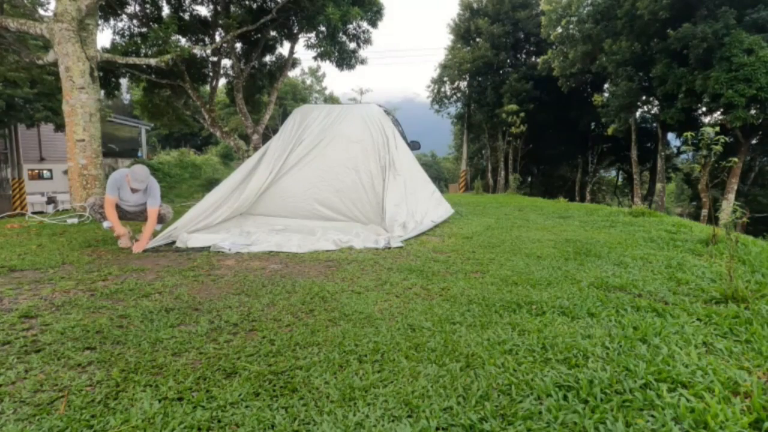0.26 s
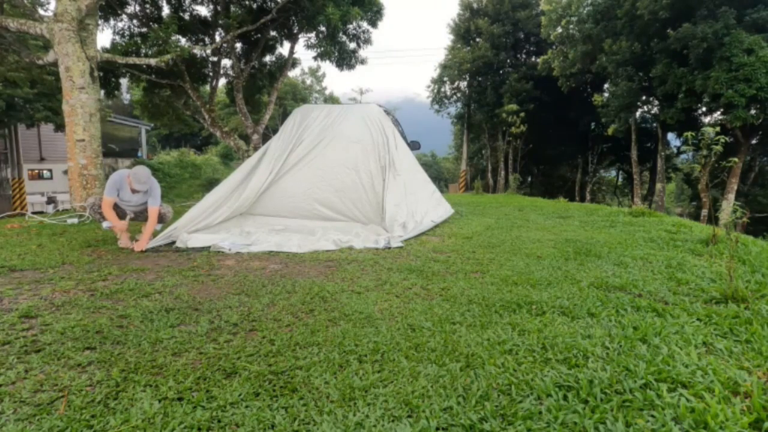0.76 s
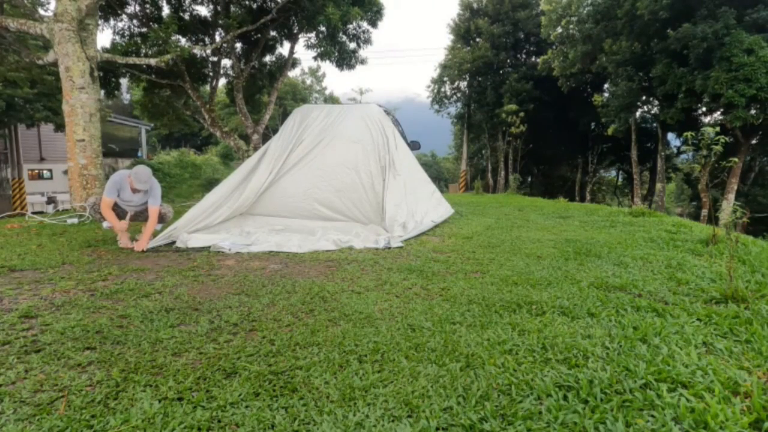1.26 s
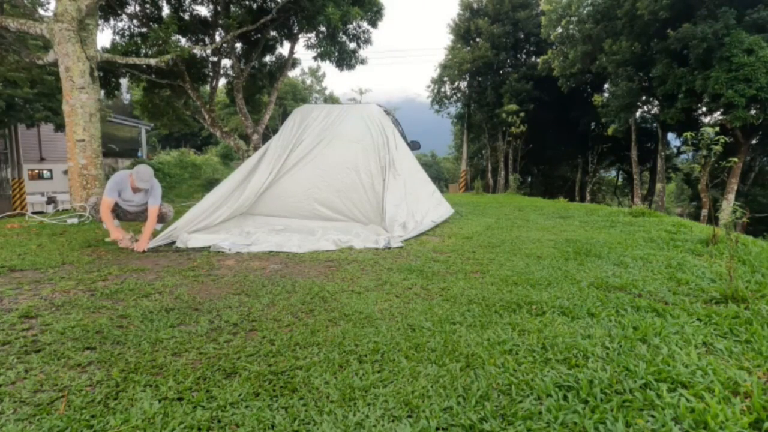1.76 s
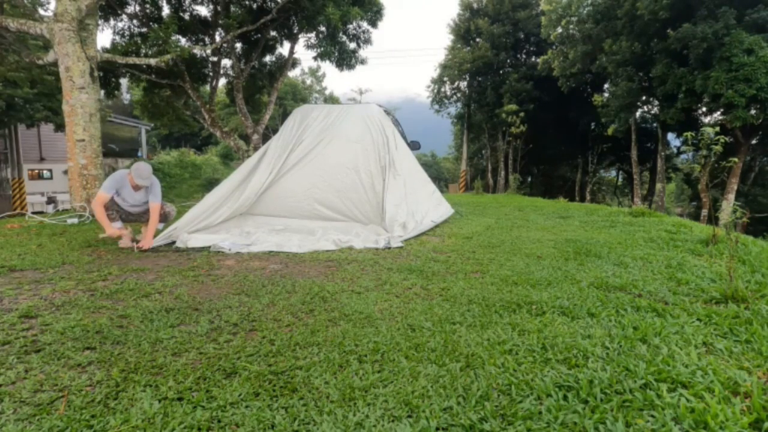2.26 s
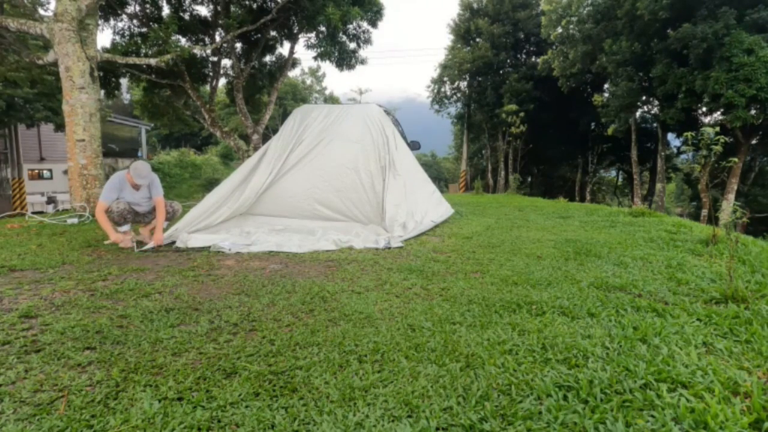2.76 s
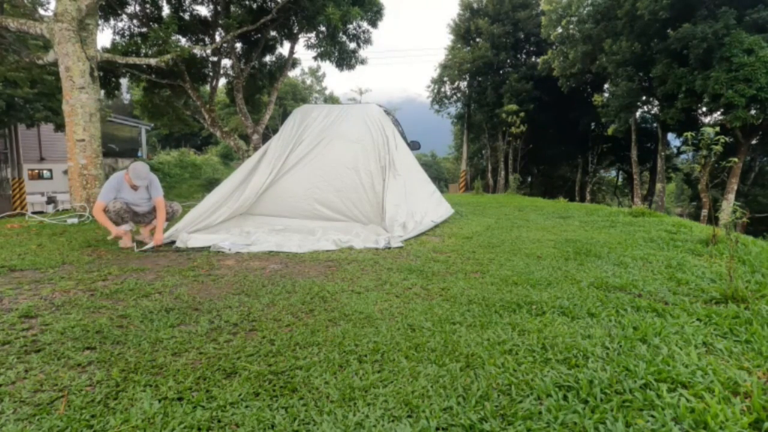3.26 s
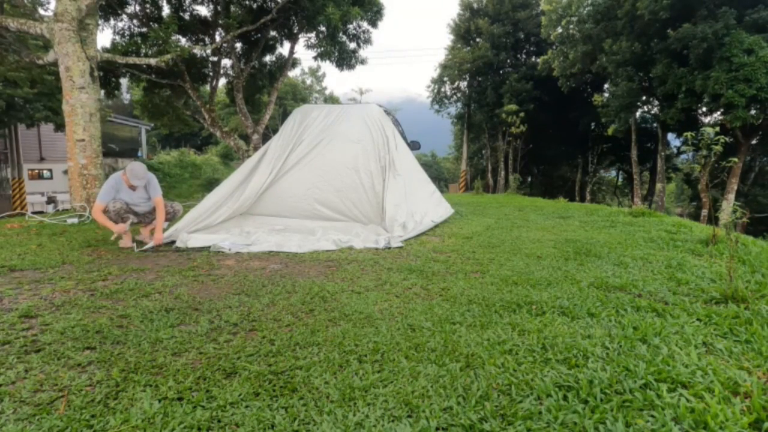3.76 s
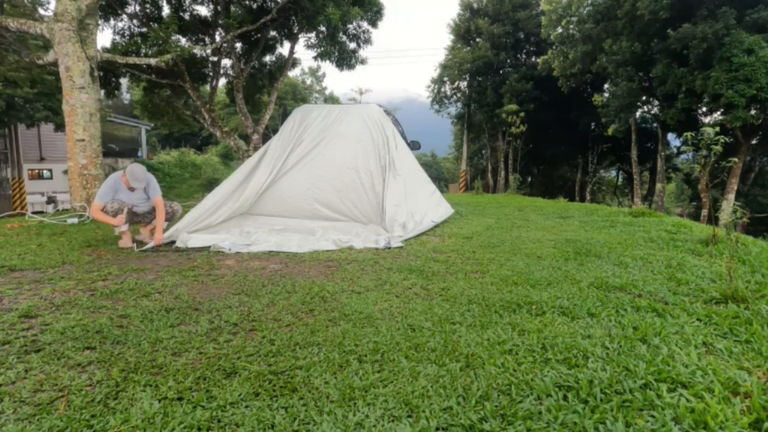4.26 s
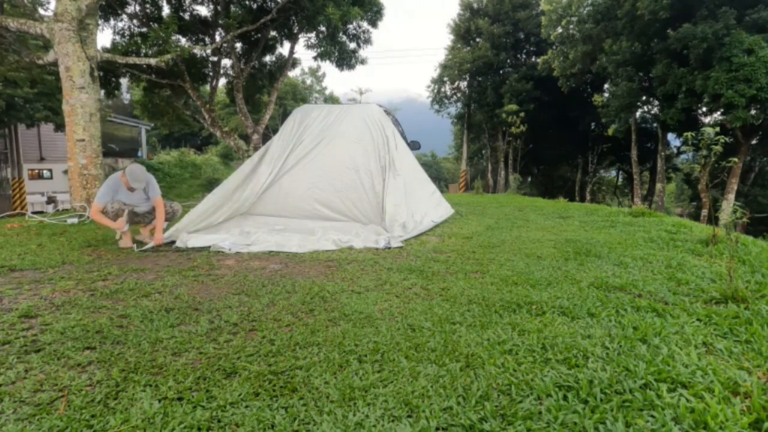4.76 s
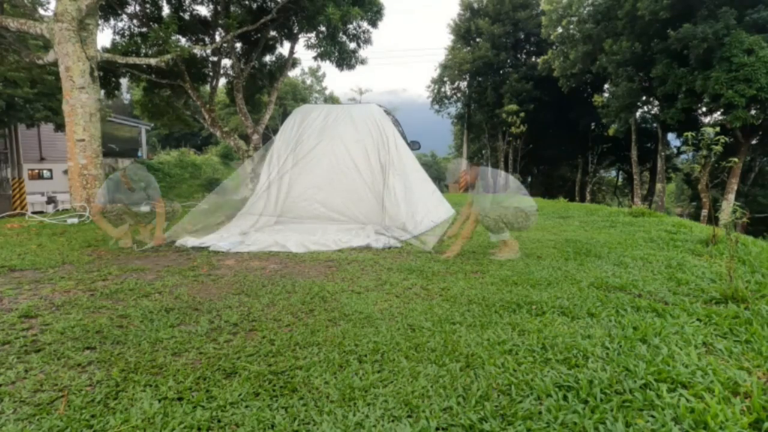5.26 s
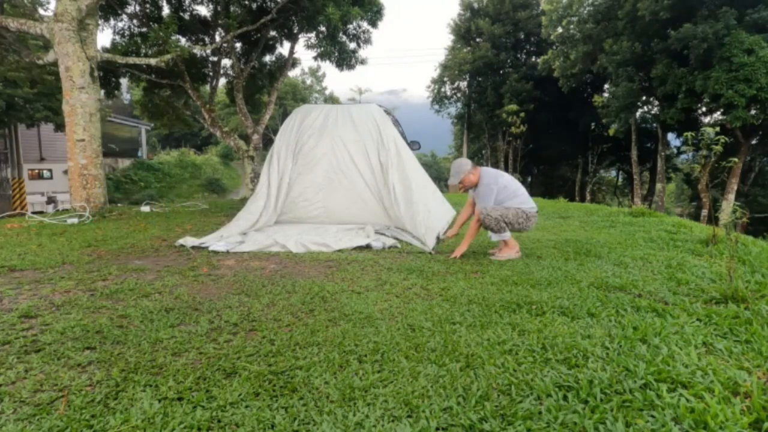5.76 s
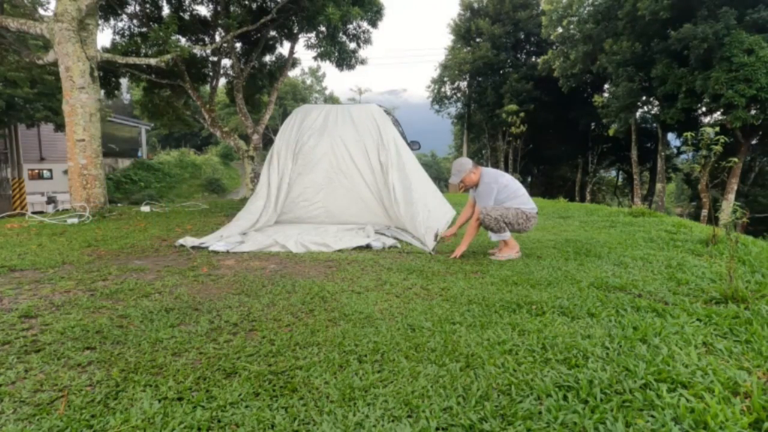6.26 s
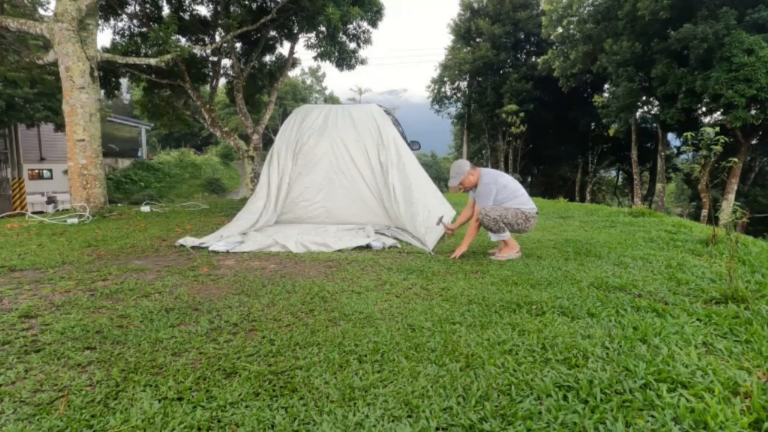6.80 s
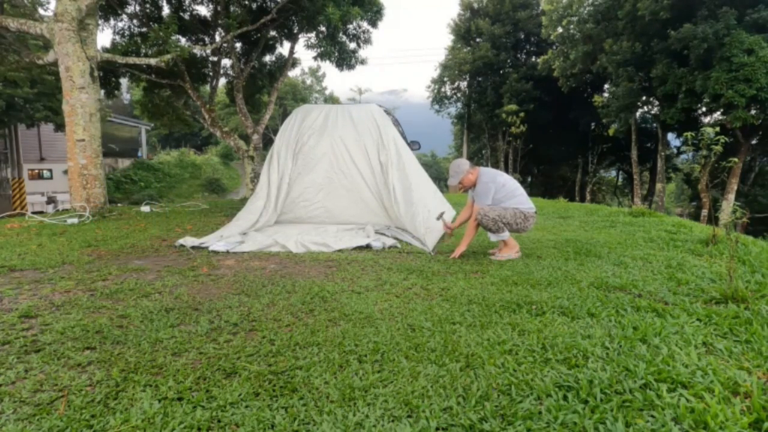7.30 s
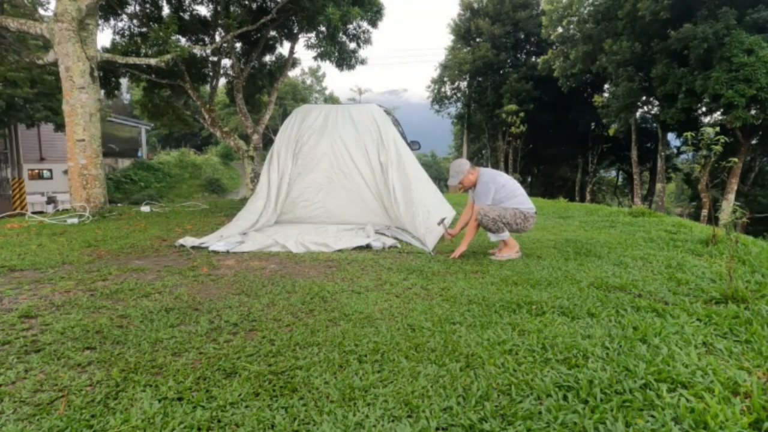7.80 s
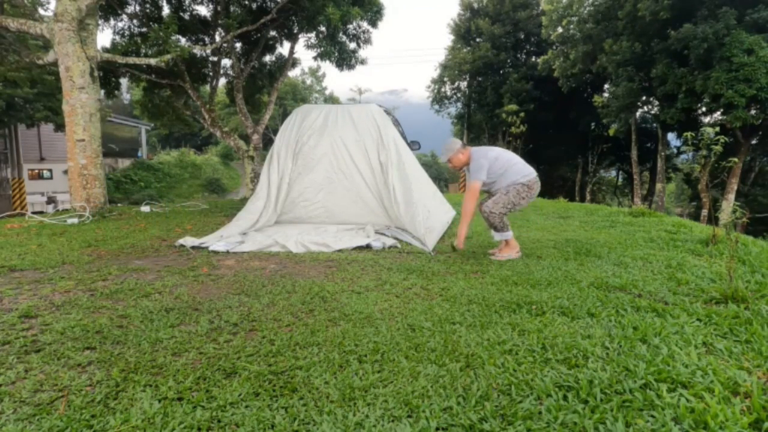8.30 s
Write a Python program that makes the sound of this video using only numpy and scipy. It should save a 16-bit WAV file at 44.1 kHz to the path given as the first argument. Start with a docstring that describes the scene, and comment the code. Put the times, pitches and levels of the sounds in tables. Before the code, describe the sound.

A steel hammer drives tent stakes into a lawn, a little over two blows a second. Each blow is a sharp metallic crack with a brief high ring, a soil thud and a short echo off canvas and trees. From 0.3 to 5 seconds the blows come slightly from the left, with solid thuds and one weaker hit near 2.8 seconds. Around 5.3 seconds the hammering shifts slightly right to a second stake, briefly overlapping the first, and continues with lighter thuds until 8 seconds. Light taps fall between blows, with a last one near 8.3 seconds.

The background is much quieter. One cricket chirps in high runs while another trills faintly farther off. A distant bird gives short whistles until about 4.5 seconds. Leaves hiss, light wind buffets the microphone and a low rumble lies far away. A faint, hollow swell of air passes near 6.5 seconds.

```python
"""Hammering tent stakes into a lawn

A steel hammer drives in two stakes, first on the left, then on the right, with light taps in between.
Each blow cracks, rings in the hammer head, thuds in the soil and echoes off trees and canvas.
Behind it two crickets chirp, a far bird whistles, leaves hiss and light wind buffets the microphone.
There is a low rumble in the distance and, once, a hollow, breathy swell."""
import sys
import numpy as np
from scipy import signal
from scipy.fft import rfft, irfft, next_fast_len
from scipy.io import wavfile

SR = 44100
rng = np.random.default_rng(int(sys.argv[2]) if len(sys.argv) > 2 else 0)


def wav_out(sig):
    """Save sig, one row per channel (or a flat mono array), as 16-bit PCM at SR to the path in sys.argv[1]."""
    wavfile.write(sys.argv[1], SR, np.round(np.clip(np.atleast_2d(sig).T, -1, 1) * 32767).astype(np.int16))


N = 376613

# How loud the background is. Each row: time in seconds, then wind, far rumble and leaves in dB.
AIR_LEVELS = [(0.0, -48, -54.5, -63), (0.55, -46, -57.5, -60.5), (3.12, -48.5, -56, -62),
              (3.52, -53.5, -58.5, -63), (3.88, -46.5, -57, -64), (5.11, -52.5, -60.5, -62.5),
              (5.76, -54, -56, -61.5), (6.59, -58.5, -56, -61), (8.54, -53.5, -54.5, -62.5)]
# The tone of those three noises. Each row: frequency in Hz, level in dB.
WIND_TONE = [(12, -46), (20, -2.5), (70, -2.5), (91, -28.5), (150, -120)]
RUMBLE_TONE = [(35, -35.5), (60, -5), (183, -7), (242, -18), (426, -39), (466, -67), (500, -36), (650, -48),
               (1100, -120)]
LEAF_TONE = [(180, -40), (300, 0), (462, -7), (870, -13.5), (1010, -8), (1510, -4), (1810, -0.5),
             (2400, -9.5), (3640, -5.5), (4830, -6.5), (5430, -6.5), (5900, -14), (8790, -18), (12100, -23),
             (16000, -43)]
# How alike left and right sound. Each row: frequency in Hz, likeness from 0 to 1.
STEREO_LIKENESS = [(30, 0.76), (100, 1), (290, 0.49), (640, 0.11), (1410, 0.69), (3100, 0.25), (6820, 0.56),
                   (15000, 0.35)]
# The breathy swell. Each row: time in seconds, level in dB.
SWELL_LEVELS = [(6.3, -79), (6.48, -56), (6.66, -75.5)]
# The bird's song. Each row: start and length in seconds, final pitch in Hz, level in dB,
# kind of note (0 low, 1 high).
BIRD_NOTES = [(0, 0.04, 1240, -58.5, 0), (0.088, 0.054, 1220, -65, 0), (0.099, 0.21, 2040, -69.5, 1),
              (0.614, 0.1, 1254, -58, 0), (1.201, .115, 1180, -70, 0), (1.175, 0.11, 1950, -64, 1),
              (1.878, .13, 1225, -67, 0), (1.866, 0.228, 1944, -64, 1), (2.63, 0.3, 1987, -70.5, 1),
              (3.458, 0.27, 1930, -69.5, 1), (4.321, 0.23, 1970, -69, 1)]
# The far cricket. Each row: time in seconds, level in dB.
TRILL_LEVELS = [(0, -73), (1, -68), (2, -73), (3.5, -93.5), (4.8, -79.5), (5.2, -76), (6, -69.5),
                (6.8, -76), (7.5, -67.5), (7.9, -81), (8.54, -92)]
# The near cricket's runs of chirps. Each row: first and last chirp in seconds, level in dB.
CHIRP_RUNS = [(0.565, 0.764, -58), (2.093, 2.661, -57.5), (2.835, 3.52, -57), (3.708, 4.622, -57),
              (4.782, 4.963, -57), (5.173, 5.567, -58), (5.745, 6.808, -55), (7.001, 7.894, -56.5),
              (8.083, 8.45, -56.5)]
# The echo from far trees. Each row: frequency in Hz, seconds to fade by 60 dB (called t60 below).
ECHO_FADES = [(300, 0.6), (1000, 0.65), (3000, 0.55), (6000, 0.55), (10000, 0.38), (15000, 0.32)]
# What trees and canvas send back. Each row: frequency in Hz, gain in dB.
ECHO_TONE = [(290, -40), (500, -10.5), (562, -15), (1400, -10.5), (4210, 2), (7210, -1.5), (8960, -7.5),
             (10400, -0.5), (11000, -14), (14200, -22.5), (16000, -49)]
# Light taps. Each row: start in seconds, tick level in dB, pitch in Hz, thump level in dB.
TAPS = [(0.35, -51, 3700, -61), (0.515, -56, 4180, -82), (1.153, -46, 1930, -66), (1.203, -57, 1570, -52),
        (1.523, -53, 3670, -77), (1.943, -54, 2100, -76), (2.414, -54.5, 4040, -44.5),
        (3.011, -52, 1760, -66), (3.106, -65, 1340, -81), (3.363, -41.5, 2300, -57),
        (3.79, -46.5, 2670, -66), (4.798, -50, 3700, -50), (5.263, -55.5, 5580, -54.5),
        (5.333, -43.5, 1100, -65), (5.388, -60, 990, -73), (5.686, -55.5, 1120, -63),
        (6.058, -50, 1880, -67), (6.106, -64.5, 1380, -73), (6.463, -43, 1090, -77),
        (6.786, -51, 3970, -66), (6.811, -49, 2330, -83), (6.837, -58, 2160, -60),
        (7.628, -48.5, 1500, -62), (7.698, -51.5, 2760, -55), (8.28, -39.5, 5160, -39.5)]
# The tone of steel hitting steel. Each row: frequency in Hz, level in dB.
CRACK_TONE = [(180, -54.5), (300, 9), (455, 1), (749, -22.5), (2210, -16.5), (6200, -1), (8940, -16.5),
              (10200, -5.5), (12300, -18.5), (14200, -30.5), (16000, -38.5)]
# The left and right stake. Each row: low and high pitch in Hz, chatter time in seconds,
# gains in dB for the dull part, bright part and echo, then dB louder on the left.
STAKES = [(2330, 4270, 0.0064, -15.5, -15.5, -3.5, 3.5), (2830, 3950, 0.008, -10, -11, -1, -3.5)]
# The pitches of the hammer head in Hz.
HEAD_HZ = [8190, 8245, 3625, 10180, 10225, 10160, 13810, 14300]
# How each of those rings. Each row: gain in dB, t60 in seconds, blow that rings it (0 glancing, 1 square).
HEAD_RINGS = [(-15.5, 0.11, 0), (-12.5, 0.033, 0), (-15.5, 0.07, 1), (-3, 0.038, 1), (-10.5, 0.16, 1),
              (-19.5, 0.11, 1), (-23.5, .07, 1), (-21, .08, 1)]
# The thud as each stake sinks, left list then right. Each row: time in seconds, pitch in Hz.
THUD_PITCH = [
    [(.26, 96), (1.2, 108), (5.4, 114)],
    [(5.3, 171.6), (7.15, 190), (7.6, 132), (8.0, 100)],
]
# The hammer blows. Each row: start in seconds, levels in dB of the crack, glancing ring, square ring,
# thud and soil crunch, then the stake (0 left, 1 right).
BLOWS = [(0.258, -26, -16, -21, -37, -43, 0), (0.657, -24, -17.5, -60, -27.5, -44, 0),
         (1.044, -23.5, -28, -21, -24, -46.5, 0), (1.444, -23, -19.5, -27, -20, -47, 0),
         (1.829, -24, -18.5, -30, -20.5, -37.5, 0), (2.206, -23, -25, -27, -21, -45.5, 0),
         (2.79, -33, -41, -65, -29.5, -35, 0), (3.223, -22.5, -52, -42, -21, -38, 0),
         (3.659, -23.5, -22, -37, -20, -40.5, 0), (4.103, -22.5, -37, -37.5, -20, -39.5, 0),
         (4.54, -22.5, -18, -28.5, -20, -41.5, 0), (4.974, -28, -16, -23, -24, -40, 0),
         (5.318, -29, -57, -25, -41.5, -54, 1), (5.436, -37, -30, -37, -33, -54, 0),
         (5.785, -26, -54, -22, -34, -40.5, 1), (6.238, -24, -56, -19.5, -36.5, -41.5, 1),
         (6.684, -25.5, -38, -20, -39, -39, 1), (7.132, -24, -33, -21.5, -34.5, -41.5, 1),
         (7.571, -23.5, -49.5, -20.5, -29.5, -39, 1), (7.991, -25, -41, -26, -31.5, -39, 1)]

NOTE_FALL_HZ, OCTAVE_DB = 41.7, (-13, -1.5)   # octave level for low and high bird notes
TRILL_START_S, TRILL_GAP_S = .0275, .0575
CHIRP_GAP_S, PAIR_GAP_S, STROKE_GAP_S = .183, .030, .013
TAP_T60_S, TAP_CLINK, TAP_PAN_DB, TAP_ECHO_DB = .028, .87, 2, -5
LOW_T60_S, HIGH_T60_S = .004, .006   # the soil quickly damps the stake's two pitches
PITCH_SPREAD = .042   # share by which those pitches vary from blow to blow
RING_SHARE = (.35, 1.0)   # share of the head's square ring time on the left and right stake
THUD_T60_S, THUD_DROP, THUD_DROP_S = .087, .6, .005   # the thud starts higher by this share and sinks
REBOUND_S, REBOUND_DB, REBOUND_PITCH, REBOUND_WIDTH_S = .045, -19, .8, .013
CUTOFF_HZ = 17000


def amp(db):
    """Turn decibels into a gain."""
    return 10 ** (np.asarray(db) / 20)


def rms_one(x):
    """Scale a sound to an average (rms) level of 1."""
    return x / np.sqrt(np.mean(x ** 2) + 1e-20)


def in_time(rows):
    """Turn each level column of a table into a curve with one value per sample."""
    s, *columns = np.transpose(rows)
    return [np.interp(np.arange(N) / SR, s, c) for c in columns]


def at_hz(points, hz):
    """Look up a table by frequency, with octaves evenly spaced."""
    freqs, values = np.transpose(points)
    return np.interp(np.log(hz), np.log(freqs), values)


def colour(x, tone):
    """Turn frequencies up or down as a tone table says."""
    size = x.shape[-1]
    hz = np.maximum(np.arange(size // 2 + 1) * SR / size, 1)
    return irfft(rfft(x) * amp(at_hz(tone, hz)), size)


def bandpass(x, low_hz, high_hz):
    """Keep what lies between two frequencies."""
    return signal.sosfilt(signal.butter(2, [low_hz, high_hz], "band", fs=SR, output="sos"), x)


def band(x, low_hz, high_hz):
    """Keep one band and scale it so its first 5 ms have level 1."""
    y = bandpass(x, low_hz, high_hz)
    return y / np.std(y[:220])


def drift(rate_hz):
    """A slow random wobble, about 1 in size."""
    r = np.exp(-80 * np.pi * rate_hz / SR)
    slow = signal.lfilter([1], [1, -2 * r, r * r], rng.standard_normal(N // 40 + 2002))[2000:]
    return np.interp(np.arange(N) / 40, np.arange(len(slow)), rms_one(slow))


def ring(x, hz, t60):
    """Let a sound set one fading pitch ringing."""
    r, w = amp(-60 / (t60 * SR)), 2 * np.pi * hz / SR
    return signal.lfilter([0, np.sin(w)], [1, -2 * r * np.cos(w), r * r], x + 1e-18)


def add(out, sound, s, pan_db=0):
    """Mix a sound in at s seconds, pan_db louder on the left."""
    i = int(np.clip(round(s * SR), 0, N))
    part = np.atleast_2d(sound)[:, :N - i]
    out[:, i:i + part.shape[1]] += part * amp([[pan_db / 2], [-pan_db / 2]])


def air_noise(tone, flicker_db, rate_hz):
    """Wind, rumble or leaves: stereo noise in half-octave bands that each flicker in level."""
    out, together, edges = 0, drift(1.5), 18 * 2 ** np.arange(0, 10, .5)
    noise = colour(rng.standard_normal((2, 2, next_fast_len(N))), tone)[..., :N]
    for k, (low, high) in enumerate(zip(edges, np.append(edges[1:-1], 19000))):
        if tone[0][0] < high and low < tone[-1][0]:
            mid, side = bandpass(noise[k % 2], low, high)   # neighbours get unrelated noise
            alike = at_hz(STEREO_LIKENESS, np.sqrt(low * high))
            gain = amp(flicker_db * (0.13 * together + drift(rate_hz)))
            out = out + gain * (np.sqrt(1 + alike) * mid + np.sqrt(1 - alike) * side * [[1], [-1]])
    return rms_one(out)


def swell():
    """A narrow band of noise rises and falls, like a hollow breath far off."""
    breath = rms_one(bandpass(rng.standard_normal(N), 770, 960))
    t = np.arange(N) / SR
    return breath * amp(in_time(SWELL_LEVELS)[0]) * (t > SWELL_LEVELS[0][0]) * (t < SWELL_LEVELS[-1][0])


def bird():
    """Whistles with an octave on top slide down a little and waver in level over the distance."""
    out = np.zeros((2, N))
    for start, length, hz, level_db, kind in BIRD_NOTES:
        along = np.linspace(0, 1, round(length * SR))
        phase = 2 * np.pi * np.cumsum(hz + NOTE_FALL_HZ * (1 - along) ** 3) / SR
        whistle = np.sin(phase) + amp(OCTAVE_DB[round(kind)]) * np.sin(2 * phase)
        add(out, amp(level_db) * np.sin(np.pi * along) ** 0.13 * whistle, start)
    return out * amp(2.5 * drift(30.5))


def far_cricket():
    """Pairs of wing strokes make a lower, unbroken trill that fades in and out with the air."""
    out, t = np.zeros((2, N)), np.arange(480) / SR
    stroke = np.sin(2 * np.pi * np.cumsum(4380 - 35000 * t) / SR) * np.hanning(len(t))
    for s in np.arange(TRILL_START_S, N / SR, TRILL_GAP_S):
        add(out, stroke, s - .005)
        add(out, .9 * stroke, s + .01)
    return rms_one(out) * amp(in_time(TRILL_LEVELS)[0] + 2.5 * drift(7))


def near_cricket():
    """Each chirp is three pairs of wing strokes, and each stroke is a short falling tone."""
    out, t = np.zeros((2, N)), np.arange(380) / SR
    fade = np.hanning(len(t)) ** 0.74
    for first_s, last_s, level_db in CHIRP_RUNS:
        for s in np.linspace(first_s, last_s, round((last_s - first_s) / CHIRP_GAP_S) + 1):
            for k in range(6):
                detune, louder, slip = rng.standard_normal(3)
                stroke = np.sin(2 * np.pi * np.cumsum(5800 + 50 * detune - 90000 * t) / SR) * fade
                start = s - .004 + PAIR_GAP_S * (k // 2) + STROKE_GAP_S * (k % 2) + 0.00074 * slip
                add(out, amp(level_db + 0.18 * k + 1.4 * louder) * stroke, start, pan_db=-1.5)
    return out


def echo(sound):
    """Canvas and near trunks slap the sound back, and far trees add a weaker tail."""
    t, edges, pattern = np.arange(SR // 2) / SR, np.geomspace(150, 19000, 7), 0
    mid, side = rng.standard_normal((2, len(t)))
    noise = mid + 0.33 * side * np.array([[1], [-1]])
    for low, high in zip(edges, edges[1:]):
        slap = amp(-9 * (t / 0.056) ** 2.2)
        tail = amp(-2 - 60 * t / at_hz(ECHO_FADES, np.sqrt(low * high)))
        pattern = pattern + (slap + tail) * bandpass(noise, low, high)
    pattern *= (1 - np.exp(-(t / 0.0048) ** 2)) * np.clip((t[-1] - t) / 0.076, 0, 1)   # soften both ends
    pattern /= np.sqrt(np.sum(pattern ** 2) / 2)
    return signal.fftconvolve(np.atleast_2d(sound), colour(pattern, ECHO_TONE), axes=1)


def taps():
    """Hammer, stake and cord touch lightly, each time with a short tick and a soft thump."""
    out, t = np.zeros((2, N)), np.arange(2205) / SR
    for s, tick_db, hz, thump_db in TAPS:
        burst = rng.standard_normal(len(t)) * (amp(-60 * t / 0.01) + amp(15 - 60 * t / TAP_T60_S))
        tick = band(burst, hz / 1.76, hz * 1.68) + 0.1 * band(burst, 1800, 6600)
        tick += TAP_CLINK * band(ring(burst, hz, t60=.006), 600, 12000)
        thump = band(rng.standard_normal(len(t)), 135, 310)
        thump *= amp(-60 * t / 0.075) * np.clip(t / 0.011, 0, 1)
        add(out, amp(thump_db) * thump + amp(tick_db) * tick, s, TAP_PAN_DB)
    return out + amp(TAP_ECHO_DB) * echo(out)[:, :N]


def soil(t, hz, thud_db, crunch_db):
    """The soil gives way with a falling thud, springs back at a lower pitch and crunches."""
    late = np.maximum(t - .0035, 0)   # it is pushed just after contact
    drop = THUD_DROP * THUD_DROP_S * (1 - np.exp(-late / THUD_DROP_S))
    push = np.sin(2 * np.pi * hz * (late + drop)) * amp(-60 * late / THUD_T60_S)
    rebound = amp(REBOUND_DB) * np.sin(2 * np.pi * REBOUND_PITCH * hz * t)
    rebound *= np.exp(-((t - REBOUND_S) / REBOUND_WIDTH_S) ** 2)
    crunch = band(rng.standard_normal(len(t)), 120, 600) * amp(-60 * t / 0.14) * np.clip(t / 0.019, 0, 1)
    return amp(thud_db) * (push + rebound) + amp(crunch_db) * crunch


def stake_crack(t, low_hz, high_hz, chatter_s, dull_db, bright_db):
    """Steel chatters on steel for a few milliseconds, which cracks and rings the stake at two pitches."""
    contact = np.clip(t / 0.00034, 0, 1) * (amp(-20 * (t / chatter_s) ** 3) + amp(-18 - 60 * t / 0.06))
    noise = rng.standard_normal((4, len(t)))
    crack = band(colour(noise[0], CRACK_TONE) * contact, 1130, 11000)
    low = band(ring(noise[1] * contact, low_hz, LOW_T60_S), 1400, 9000)
    high = band(ring(noise[2] * contact, high_hz, HIGH_T60_S), 1100, 7400)
    dull = band(noise[3] * contact, 1000, 2000)
    dull = band(dull, 1070, 2100)
    bright = band(colour(noise[3], CRACK_TONE) * contact, 12000, 14000)
    return crack + 0.57 * low + 1.13 * high + amp(dull_db) * dull + amp(bright_db) * bright


def hammer_head(click, glancing_db, square_db, ring_share):
    """The steel head rings at some pitches when it glances off and at others when it lands squarely."""
    out = 0
    for hz, (db, t60, square) in zip(HEAD_HZ, HEAD_RINGS):
        level_db, fade_s = (square_db, t60 * ring_share) if square else (glancing_db, t60)
        luck_db = 2 * rng.standard_normal()   # no two blows land alike
        out = out + amp(level_db + db + luck_db) * ring(click, hz, fade_s)
    return out


def blows():
    """Each blow sounds the stake, the hammer head and the soil, and the metal sounds echo."""
    out, t = np.zeros((2, N)), np.arange(SR // 4) / SR
    click = signal.unit_impulse(len(t), 30)
    for s, crack_db, glancing_db, square_db, thud_db, crunch_db, stake in BLOWS:
        low_hz, high_hz, chatter_s, dull_db, bright_db, echo_db, pan_db = STAKES[stake]
        low_hz, high_hz = [low_hz, high_hz] * np.exp(PITCH_SPREAD * rng.standard_normal(2))
        thud_hz = np.interp(s, *np.transpose(THUD_PITCH[stake]))
        crack = amp(crack_db) * stake_crack(t, low_hz, high_hz, chatter_s, dull_db, bright_db)
        head = hammer_head(click, glancing_db, square_db, RING_SHARE[stake])
        add(out, crack + head, s - .0003, pan_db)
        add(out, soil(t, thud_hz, thud_db, crunch_db), s)
        # In the echo, a ringing click stands in for the crack.
        snap = np.linalg.norm(crack) * (click + 0.07 * ring(click, high_hz, HIGH_T60_S))
        add(out, amp(echo_db) * echo(snap + 0.37 * head), s, 0.28 * pan_db)
    return out


def scene():
    """Add up all the sounds in stereo, from the background to the hammer."""
    wind_db, rumble_db, leaves_db = in_time(AIR_LEVELS)
    wind = amp(wind_db) * air_noise(WIND_TONE, flicker_db=4.5, rate_hz=5.9)
    rumble = amp(rumble_db) * air_noise(RUMBLE_TONE, flicker_db=1.0, rate_hz=13.0)
    leaves = amp(leaves_db) * air_noise(LEAF_TONE, flicker_db=1.6, rate_hz=13.0)
    return wind + rumble + leaves + swell() + bird() + far_cricket() + near_cricket() + taps() + blows()


def record(dry):
    """Cut away the very highest treble."""
    return signal.sosfilt(signal.cheby2(12, 70, CUTOFF_HZ, fs=SR, output="sos"), dry)


dry = scene()
out = record(dry)
wav_out(out)
```